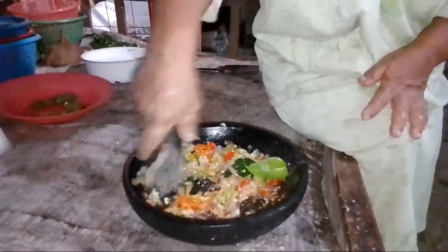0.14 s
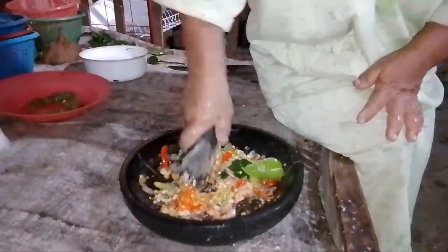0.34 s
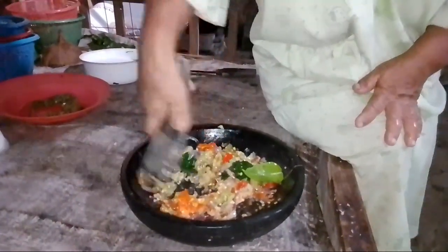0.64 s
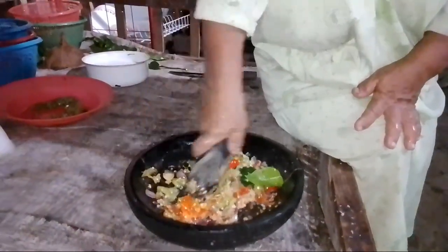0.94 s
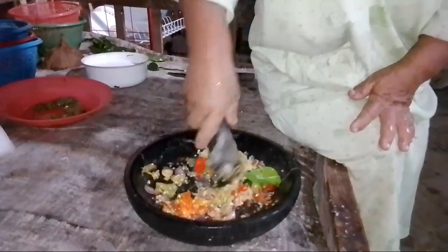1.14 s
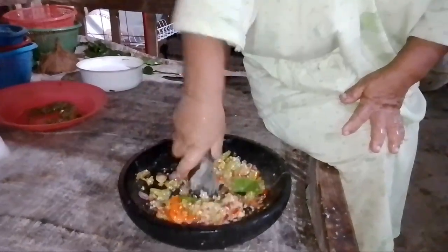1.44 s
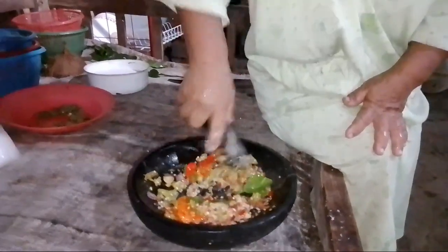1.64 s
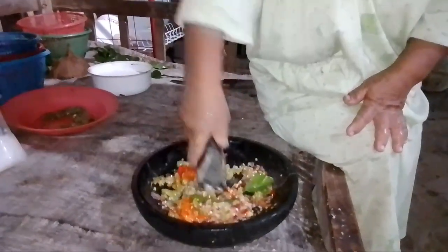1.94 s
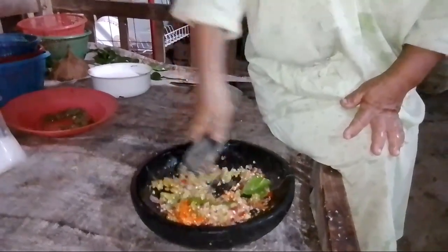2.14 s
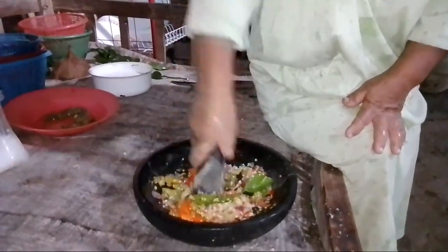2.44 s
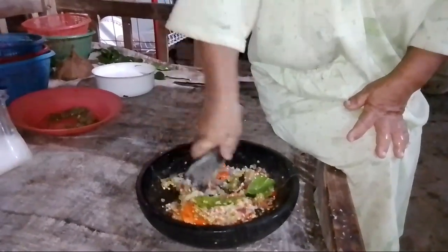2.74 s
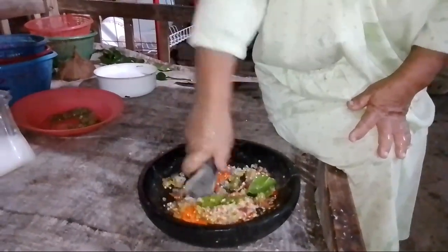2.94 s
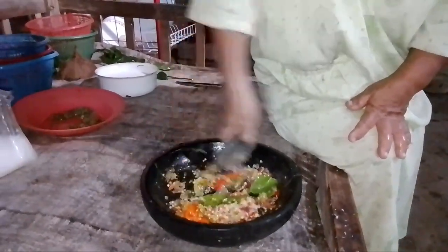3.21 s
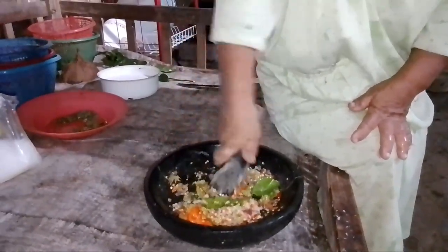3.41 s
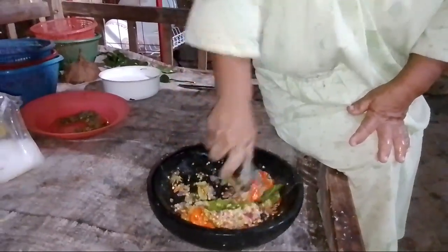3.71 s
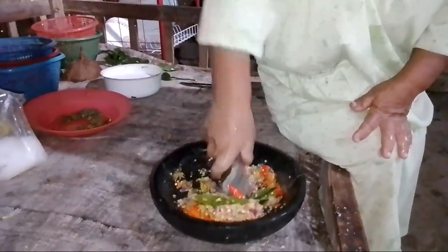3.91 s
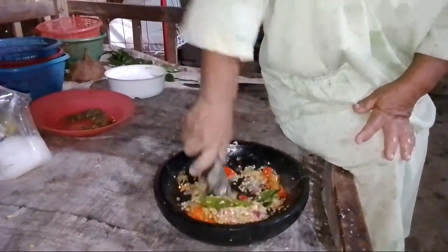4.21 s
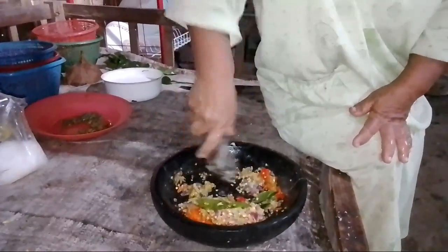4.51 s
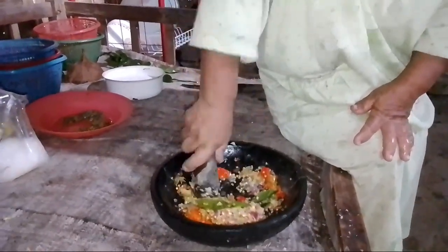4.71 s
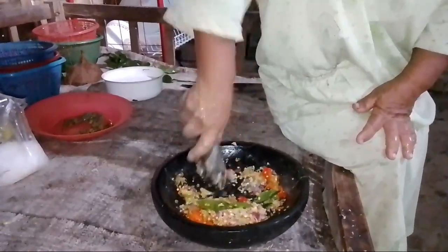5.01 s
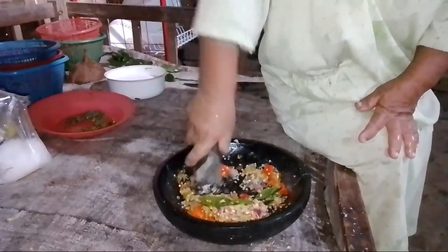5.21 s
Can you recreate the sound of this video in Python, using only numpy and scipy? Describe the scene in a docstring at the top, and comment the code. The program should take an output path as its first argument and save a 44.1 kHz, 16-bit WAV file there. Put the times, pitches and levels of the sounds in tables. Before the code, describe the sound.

Uneven grinding in a quiet, small kitchen: brief crunchy pushes, seed cracks, juicy spitting, faint wet squeaks and low booms through a wooden table. Two bright, quickly damped stone clacks stand far above the rest, one right at the start and one halfway. After each, the recorder's limiter pulls everything down and it slowly recovers. Close, mono, short room reflections.

```python
"""A small crack in a quiet kitchen, then a hard knock: a stone pestle works wet spices in a shallow stone mortar.
Each push shapes noisy trains of clicks into three layers: wooden table boom, grit crunch and juicy fizz.
Cracks are dying bursts of clicks through the same layers, squeaks are clicks through a narrow resonance,
and knocks ring the modes of the stone, two of them on bare stone.
The knocks slam the recorder's limiter down, and the kitchen swells back over a couple of seconds."""
import sys
import numpy as np
from scipy import signal
from scipy.io import wavfile
from scipy.ndimage import uniform_filter1d

SR = 44100
rng = np.random.default_rng(int(sys.argv[2]) if len(sys.argv) > 2 else 0)


def inscribe(sig):
    """Save sig as 16-bit PCM at rate SR to the path in sys.argv[1].

    A 1-D sig is mono; a 2-D sig holds one channel per row.
    Samples are clipped to [-1, 1] before scaling.
    """
    pcm = np.round(np.clip(np.atleast_2d(sig).T, -1, 1) * 32767)
    wavfile.write(sys.argv[1], SR, pcm.astype(np.int16))


N = 236023
TIME = np.arange(N) / SR
FFT_HZ = abs(np.fft.fftfreq(4096, 1 / SR))


def amp(db):
    """Decibels to gain."""
    return 10 ** (np.asarray(db) / 20)


def unit(x):
    """Scales to an rms of 1."""
    return x / np.sqrt(np.mean(x ** 2) + 1e-20)


def read(points, hz):
    """Reads a curve on a log-frequency axis."""
    point_hz, value = np.transpose(points)
    return np.interp(np.log(hz + 1), np.log(point_hz + 1), value)


def add(mix, start_s, sound):
    """Mixes a sound in at start_s."""
    part = mix[max(round(start_s * SR), 0):][:len(sound)]
    part += sound[:len(part)]


def through(x, response):
    """Convolves with a response scaled to unit energy."""
    return signal.oaconvolve(x, response / np.linalg.norm(response))[:N]


def causal(gain):
    """The minimum-phase click with this gain at FFT_HZ: it starts at once and has an energy of 1."""
    log_spectrum = np.conj(signal.hilbert(np.log(gain + 1e-5)))
    click = np.fft.ifft(np.exp(log_spectrum)).real[:len(gain) // 2]
    return click / np.linalg.norm(click)


def colour(points):
    """The click that has this spectrum."""
    return causal(amp(read(points, FFT_HZ)))


# the still kitchen's noise colour: pitch_hz [Hz], relative_db [dB per Hz]
KITCHEN_COLOUR = [(15, 3), (35, 2), (70, 0.5), (180, 2.5), (300, -16.5), (600, -22), (1200, -44),
                  (3000, -41), (6000, -61), (8000, -45.5), (12000, -51)]


def kitchen(level_db=-52):
    """Steady noise, mostly low, stands for the air of the still room."""
    return amp(level_db) * through(rng.standard_normal(N), colour(KITCHEN_COLOUR))


def grains(count, per_s, spread_db):
    """A random train of clicks of either sign, their heights spread exponentially in dB; rms 1."""
    chance, sign, size = rng.random((3, count))
    heights = amp(spread_db * np.minimum(-np.log(1 - size), np.pi))
    return unit((chance < per_s / SR) * np.sign(sign - .5) * heights)


def judder(depth_db, hz):
    """Stick and slip: a random gain, slower than hz, that clumps the grains."""
    low_pass = signal.butter(2, hz, fs=SR, output="sos")
    wobble = unit(signal.sosfilt(low_pass, rng.standard_normal(N)))
    return unit(amp(depth_db * 2 * np.tanh(wobble / 2)))


# seeds and chunks that give way under the pestle, levels before the layer gains:
# start_s [s], thud_db [dB], crack_db [dB], splash_db [dB]
CRACKS = [(0.027, -44.5, -42.5, -80), (0.133, -28, -18.5, -37), (0.222, -32, -34, -57),
          (0.308, -39, -29.5, -51), (0.374, -63, -31, -50), (0.613, -59, -39, -55.5),
          (0.674, -38, -37, -66), (0.727, -50, -28.5, -39.5), (0.879, -50, -31.5, -68),
          (1.133, -36, -38, -72), (1.283, -58, -31.5, -52.5), (1.298, -56, -26, -63),
          (1.405, -37.5, -40, -51), (1.456, -47, -42, -47), (1.551, -40.5, -40.5, -58),
          (1.633, -30.5, -33.5, -38), (1.709, -47, -32, -43.5), (1.843, -45, -41, -56),
          (1.864, -59, -41, -46), (1.988, -39, -45, -68), (2.073, -51, -39.5, -54.5),
          (2.124, -46, -29, -50), (2.149, -34, -32, -55.5), (2.188, -40, -35, -46),
          (2.456, -39, -44.5, -67), (2.583, -35, -20.5, -39.5), (2.755, -63, -36.5, -43.5),
          (3.134, -48, -37, -40), (3.166, -36, -42, -57), (3.2, -28.5, -26, -41), (3.3, -52, -43, -48),
          (3.765, -48, -30, -43), (3.843, -44, -41.5, -52), (4.08, -66, -40.5, -41.5),
          (4.123, -32.5, -37, -66), (4.166, -43, -48, -41.5), (4.274, -47, -38.5, -47),
          (4.415, -43, -45.5, -59), (4.506, -32, -63, -44), (4.53, -24.5, -26, -41.5),
          (4.553, -45, -50, -39), (4.577, -36, -32, -43), (4.862, -37.5, -42, -57.5),
          (4.938, -44, -44, -39), (4.994, -34, -32.5, -49.5), (5.284, -46, -37.5, -57)]


def crushing(push, column, per_s, spread_db, judder_db, judder_hz, crack_db, pops=0):
    """Grains and stray pops follow the push, and each crack is a dying burst of grains."""
    stream = grains(N, per_s, spread_db) * judder(judder_db, judder_hz)
    stream = stream + pops * grains(N, per_s=45, spread_db=4.5)
    force = push * unit(stream)
    size, decay_s = 2000, 0.0058
    decay = np.exp(-np.arange(size) / SR / decay_s)
    for row in CRACKS:
        burst = grains(size, 9000, 2.1) * decay
        burst[0] += 2.5  # a sharp first break
        burst *= np.sqrt(size / np.sum(burst ** 2))
        add(force, row[0], amp(row[column] + crack_db) * burst)
    return force


# pushes of the pestle, two or three to each rock of the wrist; levels before the layer gains,
# hollowness as low over high: a thick cushion of pulp sounds hollow, bare grit thin
# start_s [s], hold_s [s], grit_db [dB], juice_db [dB], hollow_db [dB]
STROKES = [(0.181, 0.071, -44, -46, 7), (0.285, 0.039, -38, -49, 2.5), (0.38, 0.038, -31, -45, 3),
           (0.717, 0.027, -33, -45, -1), (0.789, 0.085, -38, -48, 5), (0.945, 0.027, -40, -60, 4),
           (1.11, 0.08, -61, -63.5, -2), (1.225, 0.019, -48.5, -49.5, -2), (1.289, 0.036, -37, -49.5, 2.5),
           (1.656, 0.0095, -42.5, -48.5, -4.5), (1.714, 0.057, -34.5, -53.5, -2.5),
           (2.125, 0.039, -34.5, -49, 0.5), (2.255, 0.05, -38.5, -52, 0), (2.632, 0.058, -37.5, -50.5, 2),
           (2.79, 0.069, -38, -52, 0), (2.941, 0.02, -43, -52, 2.5), (3.133, 0.066, -39, -45.5, 5),
           (3.296, 0.038, -37.5, -53, 3), (3.655, 0.047, -45, -53.5, 3), (3.756, 0.028, -36.5, -50.5, -4.5),
           (3.89, 0.026, -52.5, -60.5, 2), (4.13, 0.039, -37, -49, 3.5), (4.19, 0.025, -42.5, -70, 0),
           (4.558, 0.025, -33.5, -52, 6.5), (4.628, 0.014, -38.5, -53.5, -3.5),
           (4.99, 0.056, -39, -57, 5.5), (5.188, 0.032, -52, -60, 8)]


def pressure(levels_db, attack_s, release_s, trail_db, trail_s, slide_db):
    """Each push builds up to its start, holds and eases off, trailing into a light slide through the pulp."""
    power = amp(slide_db) ** 2 * np.ones(N)
    for (start_s, hold_s, *_), db in zip(STROKES, levels_db):
        early = np.maximum(start_s - TIME, 0)
        late = np.maximum(TIME - start_s - hold_s, 0)
        rise = np.exp(-np.minimum(early / attack_s, 20))
        fall = np.exp(-late / release_s) + amp(trail_db) * np.exp(-late / trail_s)
        power += (amp(db) * rise * fall) ** 2
    return np.sqrt(power)


def shifting(x, depth_db, patch_hz, patch_s, size):
    """The point of contact keeps moving, so the energy hops between patches of the spectrum."""
    hop = size // 4
    z = signal.stft(x, SR, nperseg=size, noverlap=size - hop)[2]
    field = rng.standard_normal(z.shape)
    for axis, span in enumerate((patch_hz * size / SR, patch_s * SR / hop)):
        field = signal.lfilter([1], [1, -np.exp(-1 / max(span, 1e-3))], field, axis=axis)
    patchy = z * amp(depth_db * unit(field))
    # each frame keeps its loudness
    patchy = patchy * np.linalg.norm(z, axis=0) / (np.linalg.norm(patchy, axis=0) + 1e-12)
    return signal.istft(patchy, SR, nperseg=size, noverlap=size - hop)[1][:N]


# the wooden table's boom: pitch_hz [Hz], relative_db [dB per Hz]
TABLE_COLOUR = [(30, 1.5), (70, -4.5), (130, -1), (250, 2.5), (390, -1.5), (490, -10.5), (620, -11.5),
                (900, -37), (3000, -73)]
# push level (before the layer gain) at the typical grit level, and dB gained per dB of grit and of hollowness
WEIGHT_DB, TYPICAL_GRIT_DB = -44.5, -35
WEIGHT_PER_GRIT, WEIGHT_PER_HOLLOW = 0.78, 0.38


def table():
    """The weight of the strokes booms through the wooden table, differently wherever the pestle bears down."""
    _, _, grit_db, _, hollow_db = np.transpose(STROKES)
    weight_db = WEIGHT_DB + WEIGHT_PER_GRIT * (grit_db - TYPICAL_GRIT_DB) + WEIGHT_PER_HOLLOW * hollow_db
    push = pressure(weight_db, attack_s=0.042, release_s=.03, trail_db=-12.5, trail_s=0.14, slide_db=-56.5)
    force = crushing(push, 1, per_s=1500, spread_db=-2.0, judder_db=1.5, judder_hz=29.8, crack_db=-6.5)
    boom = through(force, colour(TABLE_COLOUR))
    return amp(-1.0) * shifting(boom, depth_db=3, patch_hz=60, patch_s=.04, size=1024)


# what pestle and mortar ring with: pitch_hz [Hz], relative_db [dB], width_hz [Hz]
STONE_MODES = [(205, -33, 60), (400, -22, 150), (612, -8, 95), (1155, 0, 135), (1370, -10, 168),
               (1579, -15, 204), (1720, -11, 110), (1920, -15, 183), (2210, -28, 160), (2452, -26, 291),
               (2808, -26, 297), (3696, -38, 925), (5370, -48, 1204), (7652, -49, 1926)]


def ring(contact_hz, rim_db=0):
    """One blow on the stone: well-damped modes, the high ones lost when the contact is soft."""
    modes = sum(amp(db) / (1 + (2 * (FFT_HZ - hz) / width_hz) ** 2) ** 1.5 for hz, db, width_hz in STONE_MODES)
    # nearer the rim, the modes above the middle ring more
    middle_hz = 1200
    place = amp(rim_db / (1 + ((middle_hz / (FFT_HZ + 1)) ** 2) ** 2))
    softness = 1 + ((FFT_HZ / contact_hz) ** 2) ** 2
    return causal(place * modes / softness)


# crushed grit: pitch_hz [Hz], relative_db [dB per Hz]
GRIT_COLOUR = [(200, -40.5), (470, -18), (620, 0), (760, -1.5), (940, -2), (1130, 2), (1350, 0),
               (1750, -3.5), (2130, -9.5), (2400, -7), (2850, -6), (3700, -18), (5200, -27.5), (9500, -42)]


def grit(split_hz=1450):
    """Hard bits crunch between the stones and set the mortar ringing."""
    start_s, hold_s, grit_db, _, hollow_db = np.transpose(STROKES)
    push = pressure(grit_db, attack_s=0.017, release_s=0.019, trail_db=-20, trail_s=0.27, slide_db=-64)
    force = crushing(push, 2, per_s=2500, spread_db=2.0, judder_db=2.5, judder_hz=77, crack_db=-9.0, pops=0.07)
    crunch = through(force, colour(GRIT_COLOUR))
    crunch = shifting(crunch, depth_db=5, patch_hz=450, patch_s=.012, size=256)
    ringing = through(force, ring(contact_hz=4700))
    stone = amp(-2.5) * crunch + amp(-19.5) * ringing
    # hollowness tilts the lows against the highs, gliding from stroke to stroke
    low = signal.sosfiltfilt(signal.butter(2, split_hz, fs=SR, output="sos"), stone)
    hollow = amp(np.interp(TIME, start_s + hold_s / 2, hollow_db) / 2)
    return low * hollow + (stone - low) / hollow


# juice: pitch_hz [Hz], relative_db [dB per Hz]
JUICE_COLOUR = [(700, -45.5), (2100, 8.5), (3000, 3), (4000, 3.5), (4650, 7), (5500, -3.5), (6900, -4),
                (7900, 3.5), (9000, -11), (10500, -20), (13500, -35.5), (15300, -17), (16000, -7)]


def juice():
    """Wet pulp fizzes and spits, its brightness flickering from patch to patch of the spectrum."""
    juice_db = np.transpose(STROKES)[3]
    push = pressure(juice_db, attack_s=.02, release_s=0.027, trail_db=-14, trail_s=0.22, slide_db=-69.5)
    force = crushing(push, 3, per_s=3000, spread_db=3.0, judder_db=2.0, judder_hz=105, crack_db=-8.0, pops=0.47)
    fizz = through(force, colour(JUICE_COLOUR))
    return amp(0.5) * shifting(fizz, depth_db=4.5, patch_hz=800, patch_s=.005, size=128)


# the pestle meets the bowl, hard on bare stone or cushioned by pulp; rim_db lifts the upper modes over the lower
# start_s [s], energy_db [dB], contact_hz [cut-off, Hz], rim_db [dB]
KNOCKS = [(0.1338, 20, 12500, 0.5), (0.6725, -10.5, 520, 4), (0.7174, -4, 564, 5), (0.74, -13, 564, 2),
          (1.633, -6, 455, -4), (1.653, -11.5, 447, 0), (2.583, 19, 12900, 5)]


def knocks(echo_s=.00385, echo_gain=0.15):
    """Each blow rings the bowl, closely followed by a near reflection."""
    out = np.zeros(N)
    for start_s, energy_db, contact_hz, rim_db in KNOCKS:
        blow = amp(energy_db) * ring(contact_hz, rim_db)
        add(out, start_s, blow)
        add(out, start_s + echo_s, echo_gain * blow)
    return out


# wet skins squeak as they slip out; level before the swell and the band limit,
# the swell peaks a third of length_s in and its tail is cut at twice length_s
# start_s [s], level_db [dB], pitch_hz [Hz], length_s [s]
SQUEAKS = [(0.264, -40.5, 3320, 0.029), (1.3, -42.5, 3120, 0.034), (2.188, -37, 2750, 0.0096),
           (3.258, -40, 2520, 0.013), (3.646, -44, 2840, 0.025), (3.696, -49, 3000, 0.04),
           (4.937, -37, 2650, .018), (4.943, -45, 3400, 0.017)]


def squeaks(width_hz=500):
    """A quick run of slips rings a small wet pocket."""
    out = np.zeros(N)
    for start_s, level_db, pitch_hz, length_s in SQUEAKS:
        count = int(2 * length_s * SR)
        slips = grains(count, 2100, 5.3)
        pocket = signal.lfilter(*signal.iirpeak(pitch_hz, pitch_hz / width_hz, fs=SR), slips)
        u = np.arange(count) / (length_s * SR / 3)
        swell = u * np.exp(1 - u)
        add(out, start_s, amp(level_db) * unit(pocket) * swell)
    band = signal.butter(2, (1400, 5500), "band", fs=SR, output="sos")
    return signal.sosfilt(band, out)


# how long the kitchen rings: pitch_hz [Hz], t60_s [s to fall 60 dB]
ROOM_DECAY = [(150, 0.25), (600, 0.2), (1200, 0.3), (3000, 0.21), (8000, 0.19), (16000, 0.13)]


def room(x, first_s=0.005, size=22050):
    """Random reflections from the kitchen, the middle lasting longest and the top treble dying first."""
    taps = grains(size, 4000, 0.62) * (np.arange(size) > first_s * SR)
    hz, t, z = signal.stft(taps, SR, nperseg=256)
    fading = z * amp(-60 * t / read(ROOM_DECAY, hz)[:, None])
    return through(x, signal.istft(fading, SR, nperseg=256)[1])


def scene():
    """Grinding and knocks close by, in a quiet kitchen."""
    still = kitchen()
    grinding = table() + grit() + juice() + squeaks()
    blows = knocks()
    reflections = room(amp(-12.5) * grinding + amp(-16.0) * blows)
    return (grinding + blows + reflections + still)[None]


def record(dry, ceiling_db=-9.1, recovery_s=1.98, offset=0.027, size=24, edge_hz=15800):
    """A limiter ducks at once and recovers slowly, with the microphone's small offset; then the band limit."""
    x = dry[0] + offset
    excess = np.maximum(1 - amp(ceiling_db) / (abs(x) + 1e-9), 0)
    ahead = np.roll(excess, -size // 2)  # looks half of size samples ahead
    fade = np.exp(-TIME / recovery_s)
    held = np.maximum.accumulate(ahead / fade) * fade  # each cut fades until a deeper one comes
    cut = uniform_filter1d(held, size)
    low_pass = signal.firwin(255, edge_hz, window=("kaiser", 8), fs=SR)
    padded = np.pad(x * (1 - cut), len(low_pass) // 2, "edge")
    return signal.oaconvolve(padded, low_pass, "valid")[None]


dry = scene()
out = record(dry)
inscribe(out)
```